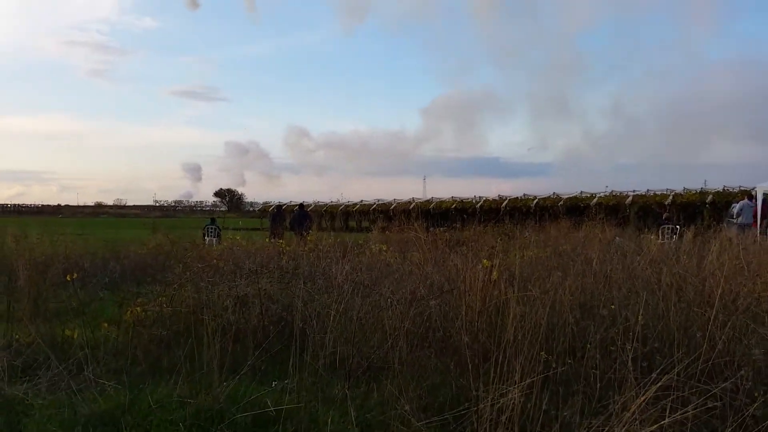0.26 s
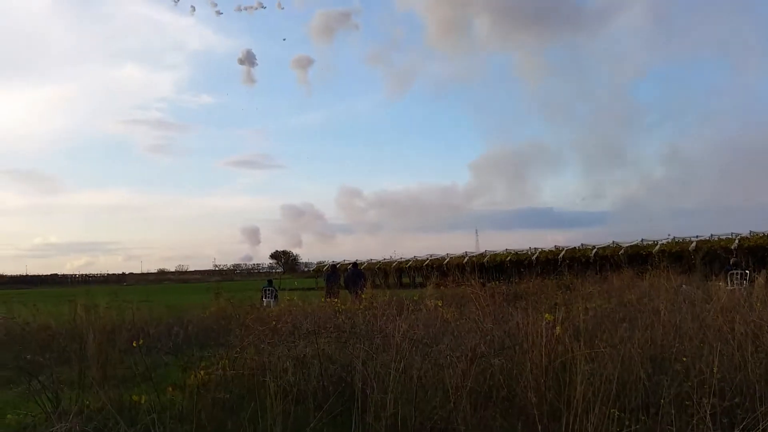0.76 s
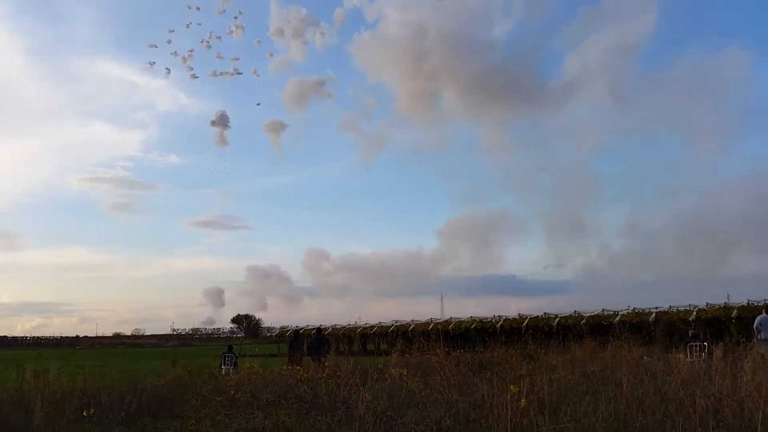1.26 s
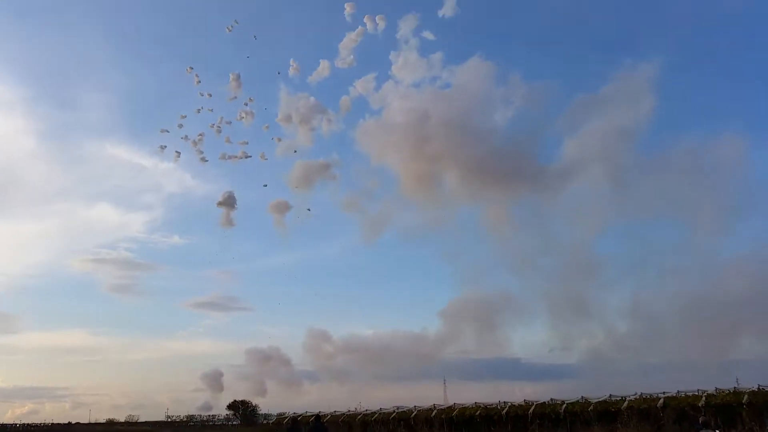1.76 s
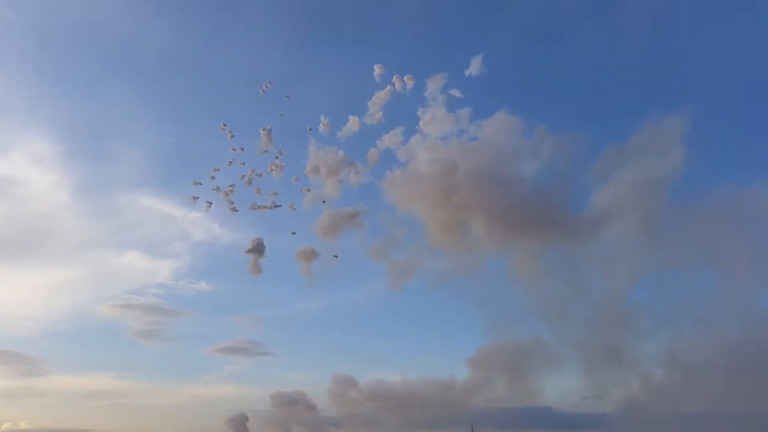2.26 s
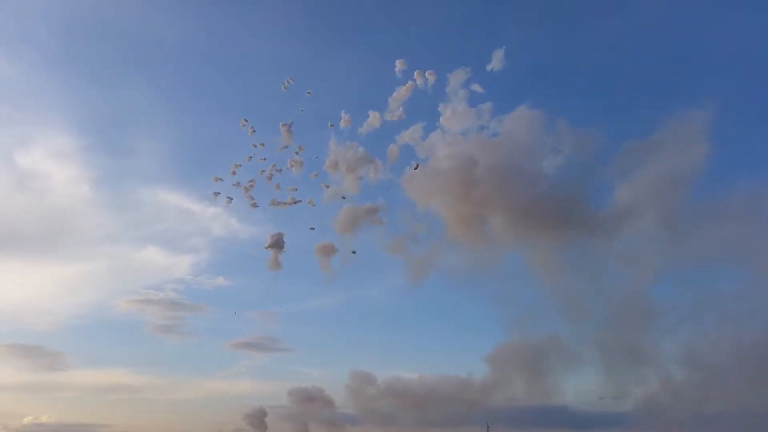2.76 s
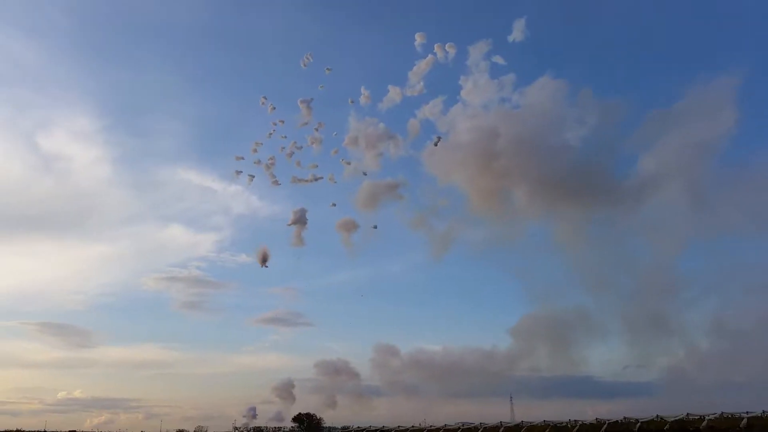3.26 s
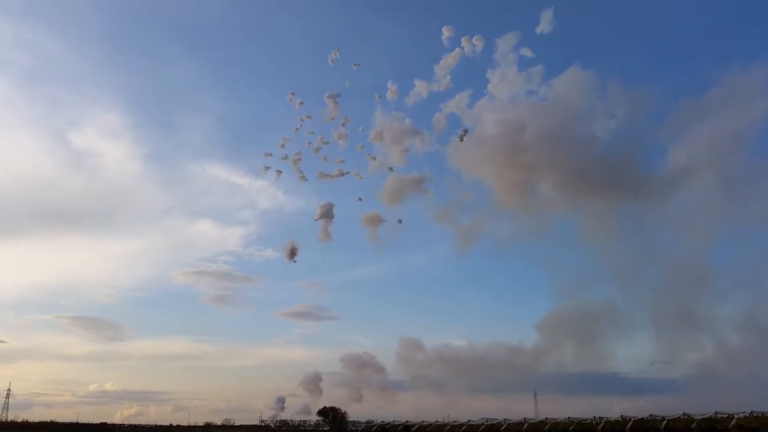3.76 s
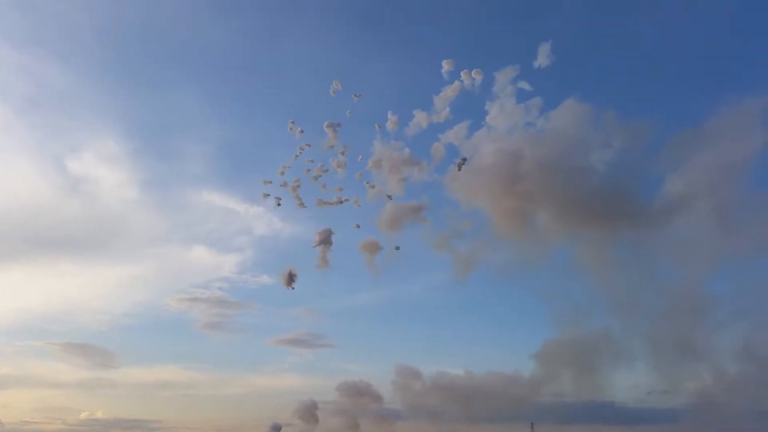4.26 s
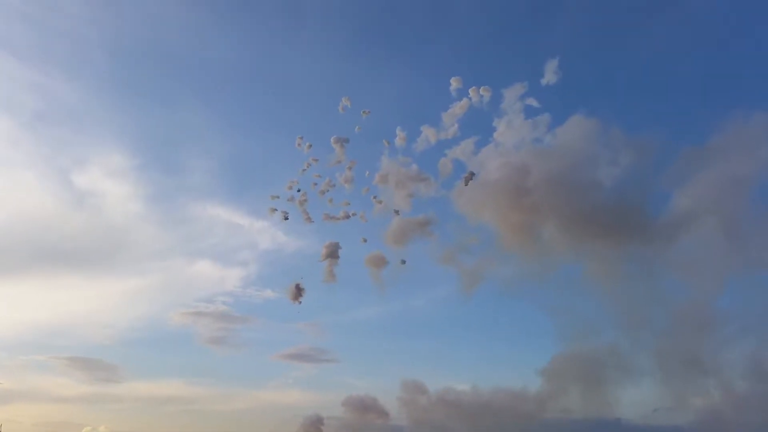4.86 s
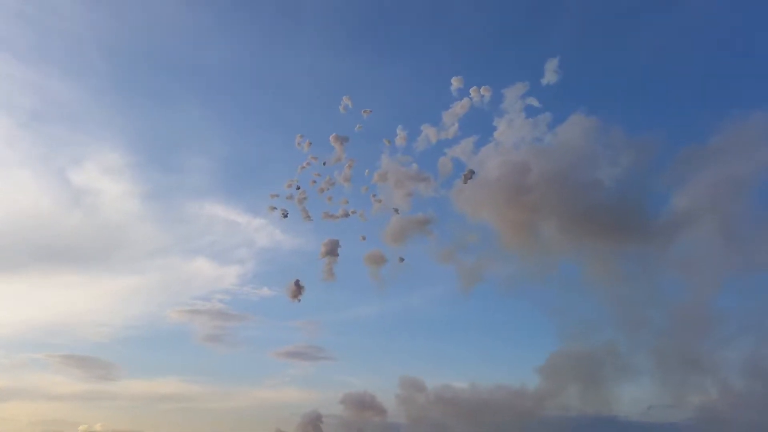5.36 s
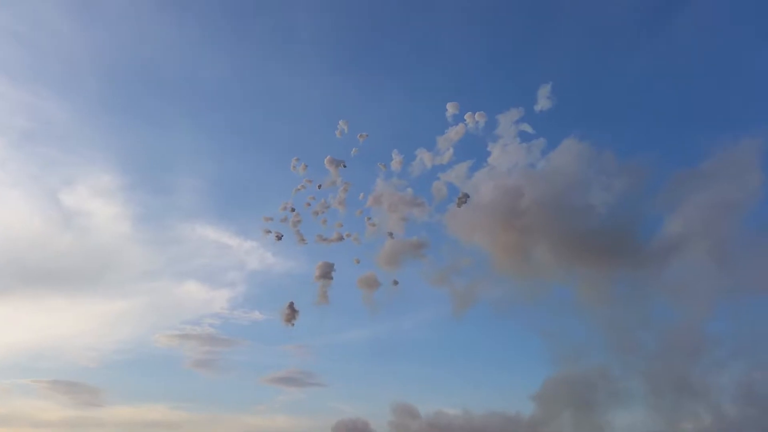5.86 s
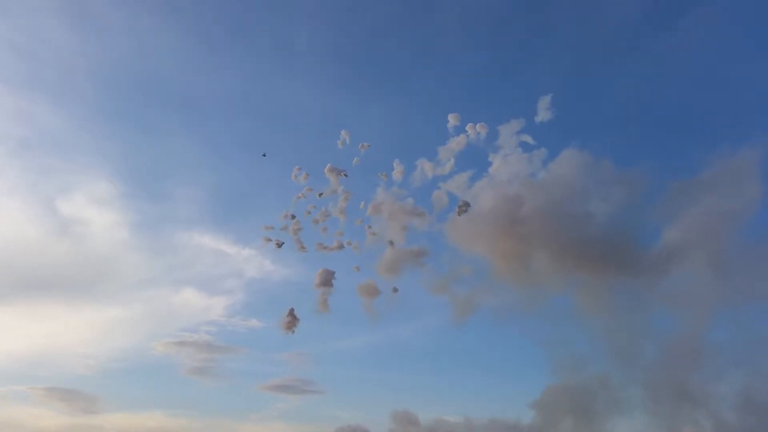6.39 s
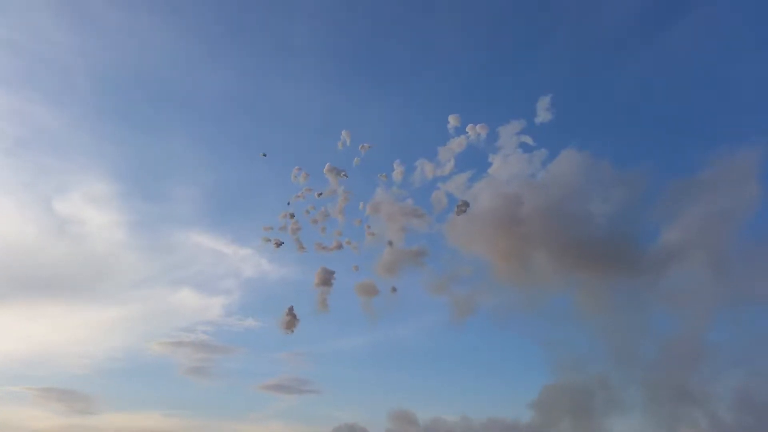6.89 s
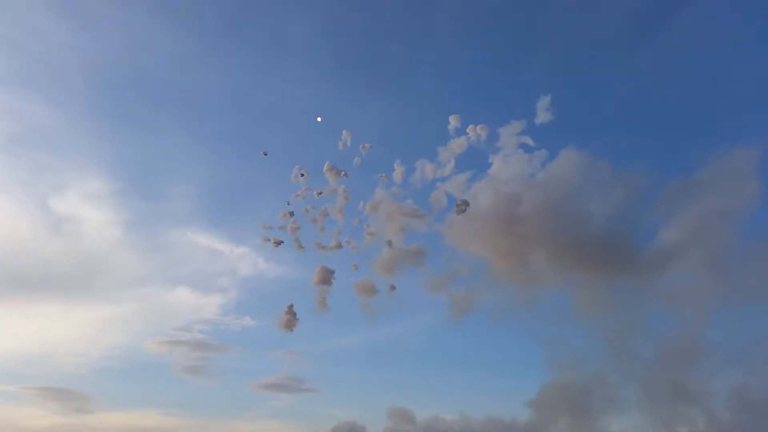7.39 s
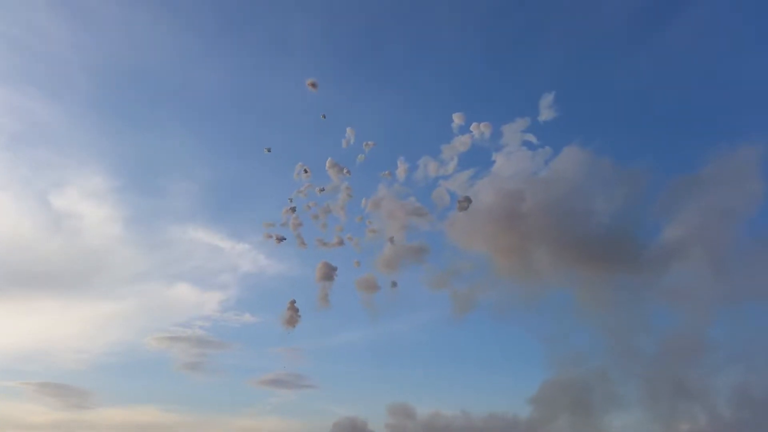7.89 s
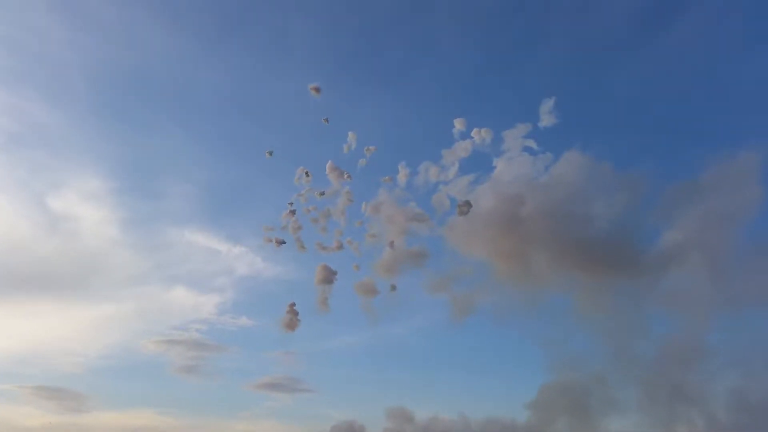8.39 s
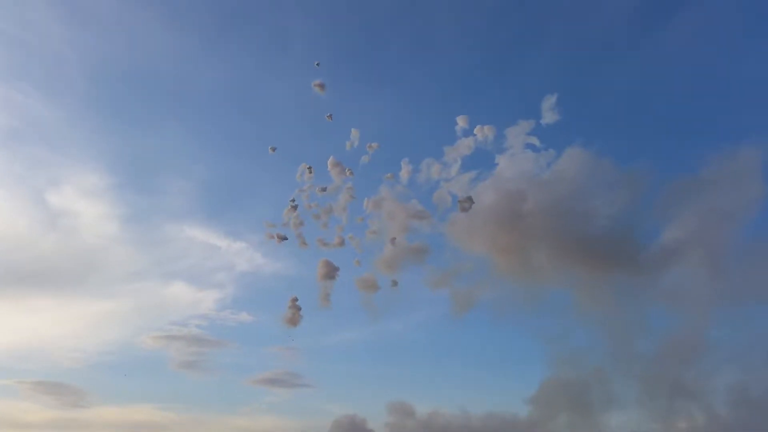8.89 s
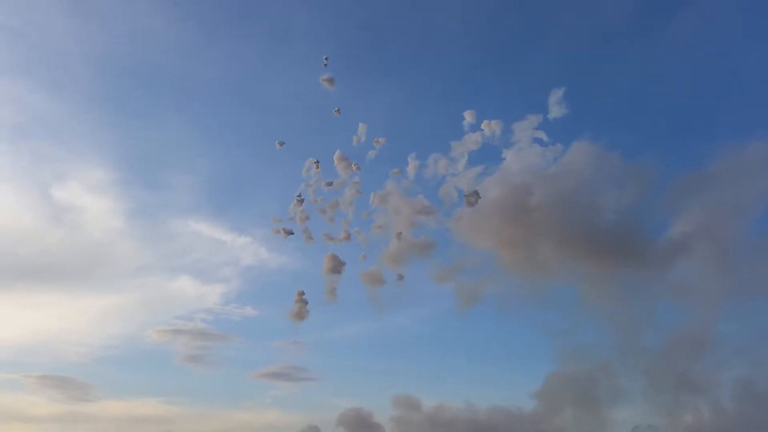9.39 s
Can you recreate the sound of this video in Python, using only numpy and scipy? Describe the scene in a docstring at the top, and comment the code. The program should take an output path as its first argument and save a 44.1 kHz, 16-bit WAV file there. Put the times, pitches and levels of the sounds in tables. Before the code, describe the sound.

An open field, small stereo microphone, no close ambience beyond a low rumble and faint rush left by an earlier burst. At about 0.8 s a volley of six sharp firework bangs rips past in 0.2 s. A second, looser cluster of cracks runs from 1.8 to 2.2 s, a third from 2.7 to 3.1 s. Then heavy shells explode singly: a very hard one at 4.0, another at 4.2, then 5.4, preceded by a short swell of rumble and rush near 5.3, then 6.0, 6.5, 6.75, 7.3, 8.05, 8.25 and 8.7 s. Every blast is abrupt, clipped and crackling, with some fizz, a grassy scatter of echoes, a dull thud and a long low roll across the land; faint ticks answer the heavy ones. The roll decays after 8.7 s, with small dry ticks near 9.0 and 9.3, until a low roar with thin hiss starts suddenly at 9.5 s and holds.

```python
"""Daytime firework shells burst over an open field: three volleys of mostly light ones, then heavy ones singly.
Each blast is a shock front, a suction and a rebound, repeated by the ground and overloading a small stereo microphone.
Grass and a crop edge scatter it as filtered noise and a dull thud; the land returns a long low rumble.
Band-passed noise makes dry ticks; shaped noise makes a distant rumble and rush that swell once, and a late roar."""
import sys
import numpy as np
from scipy import signal
from scipy.fft import rfft, irfft, next_fast_len
from scipy.io import wavfile
from scipy.ndimage import uniform_filter1d

SR = 44100
rng = np.random.default_rng(int(sys.argv[2]) if len(sys.argv) > 2 else 0)


def to_wav(s):
    """Save 16-bit WAV."""
    ch = np.atleast_2d(s).T  # columns
    pcm = np.round(np.clip(ch, -1, 1) * 32767)  # PCM
    wavfile.write(sys.argv[1], SR, pcm.astype(np.int16))


N = 425124
T = np.arange(N) / SR

# shell bursts, the last row a dull echo thump of the one before:
# t/s, front pressure/dB re 1, weight (0 light, 1 heavy), crack/dB, fizz/dB (both before port gain)
ARRIVALS = [ (0.825, 6.5, 0.092, -18.5, -46), (0.8608, 18, 0.11, -14, -38), (0.8904, 11, 0.18, -8, -20),
            (.919, 13.5, 0.15, -24, -30), (.9253, 13.5, 0.055, -12.5, -23.5),
            (1.0037, 13, 0.08, -11, -26.5), (1.8069, 14.5, 0.058, -18.5, -48),
            (1.8142, 10.5, 0.16, -20, -43), (1.8655, 12.5, .03, -14.5, -36),
            (1.8986, 8.5, 0.33, -12.5, -28), (1.94, 14, 0.039, -22, -31), (1.9641, 7, 0.024, -15.5, -33),
            (2.0806, 11.5, .05, -14, -15.5), (2.1193, 12, 0.16, -16.5, -28.5),
            (2.1812, 10.5, 0.024, -17, -28.5), (2.6634, 8.5, 0.075, -14.5, -50),
            (2.7023, 15.5, 0.57, -13, -28), (2.772, 15, 0.32, -12, -24.5), (2.86, 17.5, 0.2, -8.5, -19),
            (2.9867, 14, .03, -13, -29), (3.068, -1, .05, -35, -36), (3.0833, 17, .03, -12.5, -28),
            (3.1226, 6, .05, -9, -28), (3.995, 22.5, 0.82, -10, -52), (4.173, 12, 0.68, -16.5, -30.5),
            (5.4156, 21, 0.91, -25, -53.5), (5.9864, 17.5, 0.86, -12.5, -48),
            (6.5102, 16.5, 0.92, -14, -55), (6.7433, 20, 0.88, -10.5, -21), (7.2746, 19.5, 0.76, -7.5, -37),
            (8.046, 16.5, 0.89, -18, -61), (8.2649, 20.5, 0.98, -7, -33), (8.6761, 20, 0.85, -10.5, -27),
            (8.6934, 3, 0.034, -32, -41)]
# blast phases by weight: (light, heavy)
PUSH_MS, SUCTION_MS = (2.1, .45), (4, 7.9)


def undb(db):
    """Decibels to amplitude gain."""
    return 10 ** (np.asarray(db) / 20)


def add(out, start_s, x):
    """Mix x into out from start_s, cut at the end of out."""
    i = int(round(start_s * SR))
    out[..., i:i + x.shape[-1]] += x[..., :N - i]


def butter(x, hz, kind, order=2):
    """Causal low-, high- or band-pass."""
    hz = np.minimum(hz, SR / 2 - 1)
    return signal.sosfilt(signal.butter(order, hz, kind, fs=SR, output="sos"), x)


def diffuse(spectrum, alike_hz, grain=0):
    """Stereo noise of overall rms 1, ports most alike well below alike_hz; grain makes it uneven, like small echoes."""
    size = next_fast_len(N)
    hz = np.fft.rfftfreq(size, 1 / SR) + 1
    points_hz, points_db = np.transpose(spectrum)
    colour = undb(np.interp(np.log(hz), np.log(points_hz), points_db))
    # one random gain per 32 samples
    grain_gain = np.repeat(np.exp(grain * rng.standard_normal(size // 32 + 1)), 32)[:size]
    mid, side = rfft(rng.standard_normal((2, size)) * grain_gain) * colour
    alike = 1 / (1 + (hz / alike_hz) ** 2)
    mid *= np.sqrt(1 + alike)
    side *= np.sqrt(1 - alike)
    x = irfft(np.array([mid + side, mid - side]), size)[:, :N]
    return x / x.std()


def by_weight(weight, ends):
    """Interpolate between the values for a light and a heavy shell."""
    return np.interp(weight, [0, 1], ends)


def dying(rise_s, t60_s, deaf_s=0.0015):
    """Summed echo power of all arrivals, as amplitude; the harder the blast, the later its echoes are heard."""
    earlier_s, earlier_db = -0.3, 9.7  # burst before the start, still dying away
    base_db, slope_db_per_db = -9, 0.7  # scatter grows with front pressure
    rate = 2 * np.log(1000) / t60_s
    power = undb(earlier_db) ** 2 * np.exp(-rate * (T - earlier_s))
    shape = (1 - np.exp(-T / rise_s)) ** 2 * np.exp(-rate * T)
    for start_s, front_db, *_ in ARRIVALS:
        gain = undb(base_db + slope_db_per_db * front_db)
        add(power, start_s + deaf_s * undb(front_db), gain ** 2 * shape)
    return np.sqrt(power)


def scatter(lumps_db=2.5, lumps_per_s=28, air_hz=6000, treble_db=3.5):
    """Grainy returns from near stalks, a hiss from the wider field, a lumpy roll from the land beyond."""
    # near, field and far echo spectra: f/Hz, relative level/dB
    near_spectrum = [(30, 14), (90, -0.5), (170, 2.5), (240, -5), (320, 0.5), (450, -12), (700, -11.5),
                     (1000, -17.5), (2100, -16.5), (3200, -31.5), (7000, -47.5), (9000, -45.5),
                     (12000, -40), (16000, -49.5)]
    field_spectrum = [(40, 5.5), (150, 3.5), (350, -11.5), (700, -5.5), (2100, -10), (3200, -18),
                      (5000, -23), (7400, -24), (9000, -39), (11000, -26), (14000, -36), (16000, -30.5)]
    far_spectrum = [(25, -14.5), (60, 0.5), (100, 3.5), (170, -6.5), (300, -14), (600, -25), (1100, -34.5),
                    (2200, -31), (3100, -46.5), (4400, -52), (6500, -81), (14000, -98)]
    knots_s = np.arange(0, T[-1] + 1, 1 / lumps_per_s)
    roll = undb(lumps_db * np.interp(T, knots_s, rng.standard_normal(len(knots_s))))
    near = undb(-12.5) * dying(0.0031, 0.25) * diffuse(near_spectrum, 530, grain=0.81)
    hiss = undb(-32) * diffuse(field_spectrum, 550)
    # the air takes the treble sooner
    treble = butter(hiss, air_hz, "high", order=1)
    field = dying(0.004, 0.8) * (hiss - treble)
    field = field + undb(treble_db) * dying(0.003, 0.39) * treble
    far = undb(-28.5) * dying(0.047, 2.93) * diffuse(far_spectrum, 380, grain=0.24)
    # only the bass of the roll is lumpy
    return near + field + far + (roll - 1) * butter(far, 450, "low", order=1)


def swell(peak_s, peak_db, rise_db_per_s, fall_db_per_s):
    """Gain that climbs to a peak and sinks, each at a steady number of dB per second."""
    return undb(peak_db - np.maximum(rise_db_per_s * (peak_s - T), fall_db_per_s * (T - peak_s)))


def distant():
    """Low rumble and a slowly fading rush hang over the land, as shaped noise; both swell once."""
    # rumble and rush spectra: f/Hz, relative level/dB
    rumble_spectrum = [(25, 6.5), (55, 5.5), (90, 4.5), (130, -0.5), (180, -11.5), (350, -15.5), (700, -32),
                       (2200, -39), (3100, -66.5), (7000, -92), (14000, -78)]
    rush_spectrum = [(100, -5), (400, -1), (700, -3), (1150, 1), (1600, -4), (2200, -10), (3000, -27),
                     (4200, -33), (5500, -53), (14000, -64)]
    rush_start_db, rush_fade_db_per_s = -53.5, 0.9
    rumble = undb(-32.5) + swell(5.29, -18.5, 110, 75)
    rush = undb(rush_start_db - rush_fade_db_per_s * T) + swell(5.34, -43.5, 44, 70)
    return rumble * diffuse(rumble_spectrum, 420, grain=0.67) + rush * diffuse(rush_spectrum, 510)


def ticks():
    """Short dry noise snaps: a few stray, and echoes of heavier shells from something hard and far off."""
    # stray ticks: t/s, peak level/dB, centre f/Hz
    stray_ticks = [(.689, -38, 900), (8.967, -31, 3000), (9.307, -36, 2400)]
    echo_delay_s, echo_gain_db, echo_hz = .347, -57, 2600
    out, t = np.zeros((2, N)), np.arange(SR // 30) / SR
    echoes = [(start_s + echo_delay_s, front_db + echo_gain_db, echo_hz)
              for start_s, front_db, weight, _, _ in ARRIVALS if weight > .5]
    for start_s, peak_db, centre_hz in stray_ticks + echoes:
        burst = rng.standard_normal((2, len(t))) * np.exp(-t / .002)
        snap = butter(burst, [centre_hz * .7, centre_hz * 1.3], "band", order=3)
        add(out, start_s, undb(peak_db) * snap / np.abs(snap).max())
    return out


def blast(t, push_ms, suction_ms, rebound=.1, rebound_ms=1.3, rise_ms=0.17):
    """Blast pressure: a sudden front that falls through zero, a longer suction, a small rebound."""
    suction_depth = .62  # against the front
    ms = t * 1000
    push = np.clip(1 - ms / push_ms, 0, 1) * np.tanh(np.maximum(ms, 0) / rise_ms) ** 2
    suction = np.sin(np.pi * np.clip((ms - push_ms) / suction_ms, 0, 1))
    late = np.maximum(ms - push_ms - suction_ms, 0) / rebound_ms
    return push - suction_depth * suction + rebound * late * np.exp(1 - late)


def shells(grass_hz=900, edge_db=-3, edge_hz=300):
    """Each blast arrives, then again softened off the grass, and duller still from the crop edge and beyond."""
    # echoes from the crop edge and beyond: delay/s, relative level/dB
    edge_echoes = [(.024, -9), (.033, -6.5), (0.0452, 7), (.187, -14.5), (.217, -12)]
    # by weight: (light, heavy)
    ground_lag_ms, right_longer_ms = (3.24, 1.66), (0.21, 2.2)  # right port holds the push longer
    rebound_ratio, edge_weight_db = (0.029, .17), (-27.5, -22)
    ground_gain, port_lag_s = .7, .00011
    blasts, echoes = np.zeros((2, N)), np.zeros(N)
    t = np.arange(SR // 20) / SR
    thud = blast(t, 2.02, 8.56, rebound=0.14, rebound_ms=3.0)
    for start_s, front_db, weight, _, _ in ARRIVALS:
        push_ms, suction_ms = by_weight(weight, PUSH_MS), by_weight(weight, SUCTION_MS)
        rebound = by_weight(weight, rebound_ratio)
        lag_s = by_weight(weight, ground_lag_ms) / 1000
        right_push_ms = push_ms + by_weight(weight, right_longer_ms)
        for port, port_push_ms in enumerate([push_ms, right_push_ms]):
            wave = blast(t - port * port_lag_s, port_push_ms, suction_ms, rebound=rebound, rebound_ms=0.49)
            wave = undb(front_db) * wave
            add(blasts[port], start_s, wave)
            add(blasts[port], start_s + lag_s, ground_gain * butter(wave, grass_hz, "low", order=1))
        for delay_s, gain_db in edge_echoes:
            echo_db = front_db + by_weight(weight, edge_weight_db) + gain_db
            add(echoes, start_s + delay_s, undb(echo_db) * thud)
    return blasts + undb(edge_db) * butter(echoes, edge_hz, "low", order=1)


def crackle(release_db=-13):
    """Overloaded capsules crack and fizz under each shock front, and crack again as the suction lets go."""
    crack, fizz, t = np.zeros(N), np.zeros(N), np.arange(SR // 50) / SR
    spell = np.exp(-(t / .0034) ** 2)
    for start_s, _, weight, crack_db, fizz_db in ARRIVALS:
        length_s = (by_weight(weight, PUSH_MS) + by_weight(weight, SUCTION_MS)) / 1000
        add(crack, start_s, undb(crack_db) * spell)
        add(crack, start_s + length_s, undb(crack_db + release_db) * spell)
        add(fizz, start_s, undb(fizz_db) * spell)
    # f/Hz, relative level/dB
    crack_noise = diffuse([(100, -6.5), (450, 5.0), (1000, -4.5), (2100, 2.0), (3200, -19),
                           (6000, -36.5), (14000, -32)], 230)
    fizz_noise = diffuse([(500, -6), (3500, 2), (7000, 0), (9000, -3), (12500, -1), (16000, -5)], 1000)
    # left capsule cracks harder, right one fizzes more
    crack_port_gain = undb(np.array([[3], [-2.5]]))
    fizz_port_gain = undb(np.array([[-.5], [2.1]]))
    return crack * crack_noise * crack_port_gain + fizz * fizz_noise * fizz_port_gain


def roar():
    """A low roar topped by a thin hiss, as shaped noise, starts suddenly and stays."""
    # f/Hz, relative level/dB
    roar_spectrum = [(30, 6), (70, 6), (130, -5), (260, -18), (500, -25), (1100, -26), (2200, -36),
                     (3000, -48), (3600, -42), (4300, -42), (5000, -64), (14000, -76)]
    start_s, rise_s, level_db = 9.48, 0.0024, -21
    return undb(level_db) * np.clip((T - start_s) / rise_s, 0, 1) * diffuse(roar_spectrum, 360)


def scene():
    """Sum of sound pressures at the two ports, before overload."""
    return scatter() + distant() + ticks() + shells() + roar()


def record(dry, swing=0.82, bass_cut_hz=78, slew_hz=2600, ceiling=0.83):
    """Capsules saturate and round each front, the bass cut makes flat tops sag, the converter limits the rest."""
    held = swing * np.tanh(dry / swing)
    # slew grows with short-term power: quiet sound passes almost untouched
    load = np.clip(uniform_filter1d(held ** 2, SR // 2000) * 4, 0, 1)
    held = held + load * (butter(held, slew_hz, "low", order=1) - held)
    x = butter(held + crackle(), bass_cut_hz, "high")
    x = x / (1 + (x / ceiling) ** 8) ** (1 / 8)
    top_hz = 16000
    return signal.sosfilt(signal.ellip(8, .2, 70, top_hz, fs=SR, output="sos"), x)


dry = scene()
out = record(dry)
to_wav(out)
```